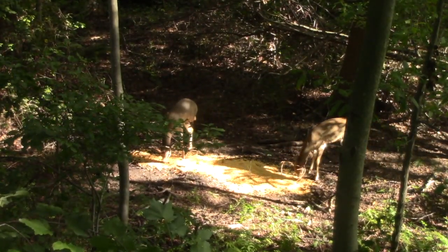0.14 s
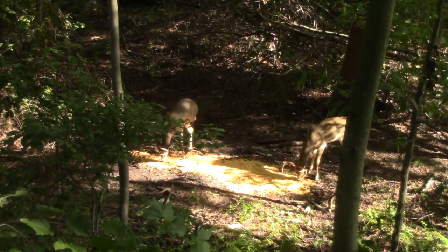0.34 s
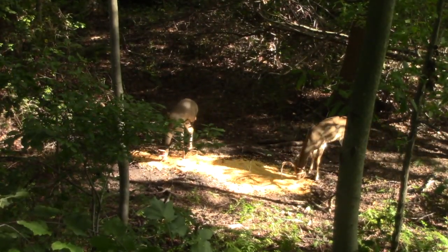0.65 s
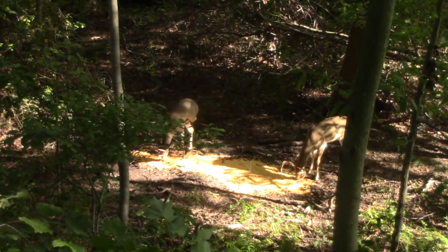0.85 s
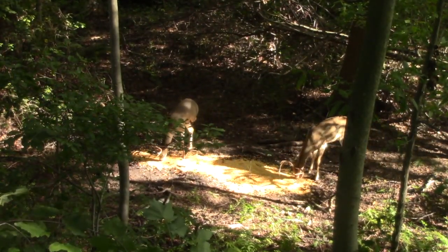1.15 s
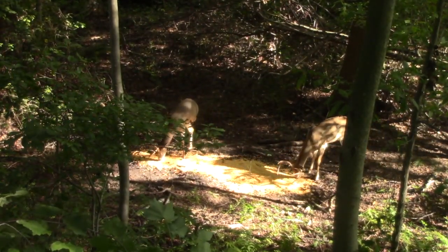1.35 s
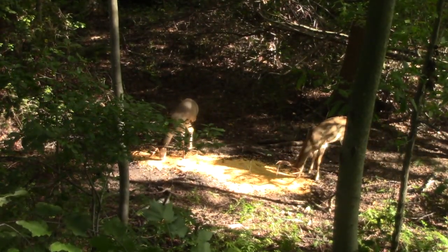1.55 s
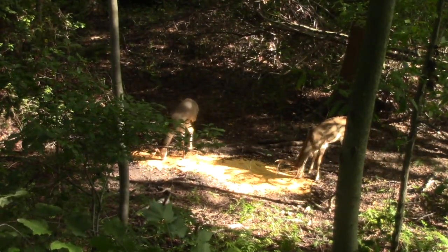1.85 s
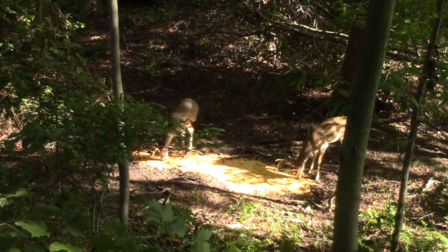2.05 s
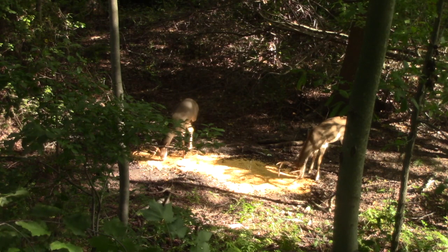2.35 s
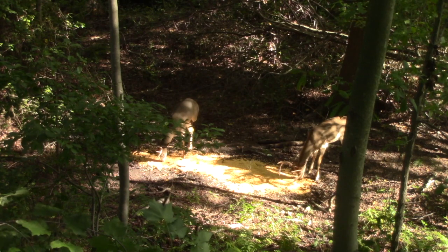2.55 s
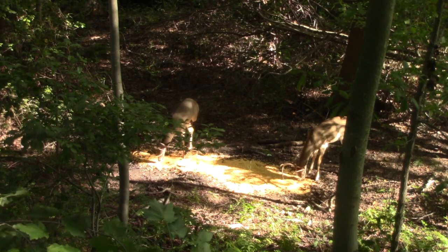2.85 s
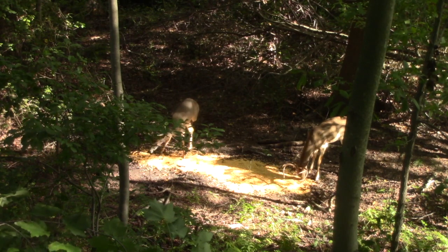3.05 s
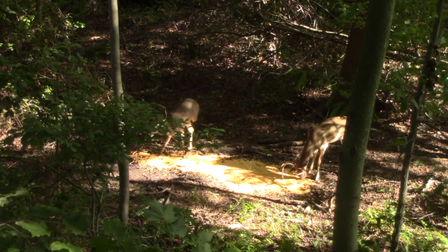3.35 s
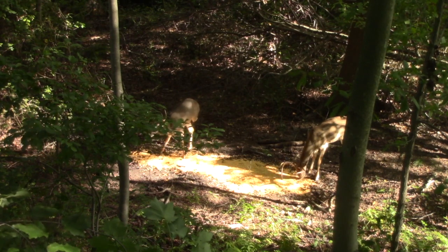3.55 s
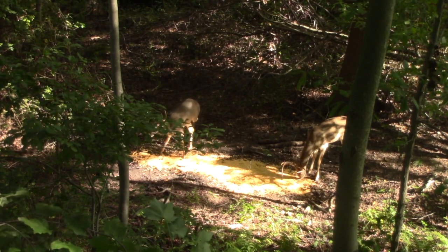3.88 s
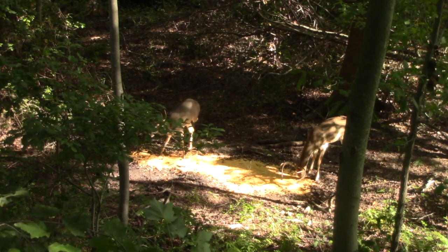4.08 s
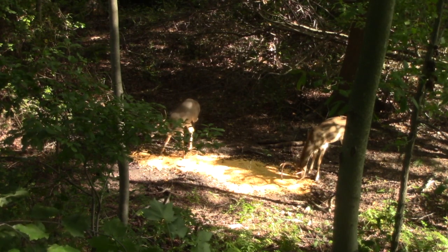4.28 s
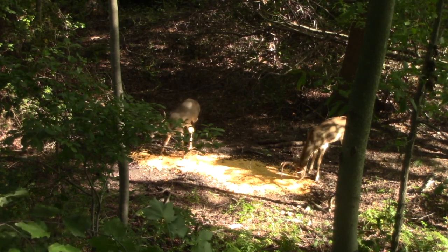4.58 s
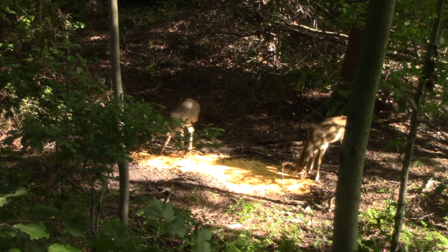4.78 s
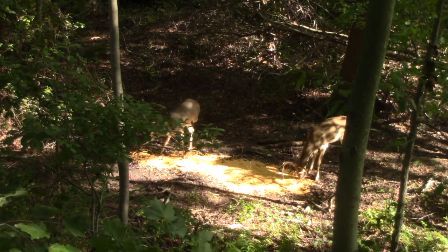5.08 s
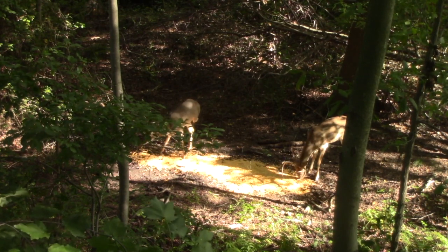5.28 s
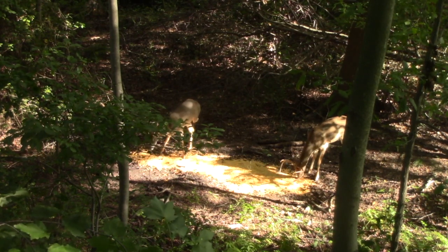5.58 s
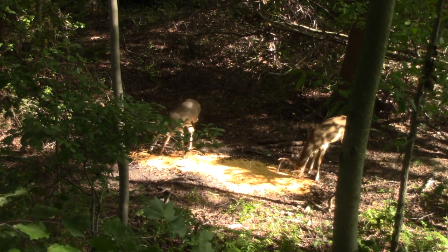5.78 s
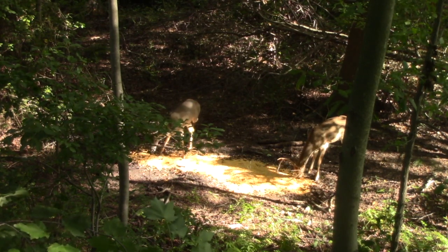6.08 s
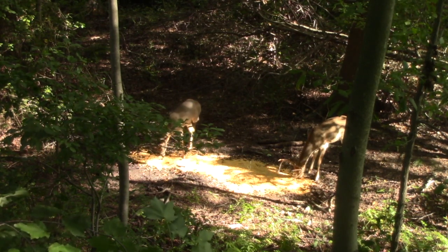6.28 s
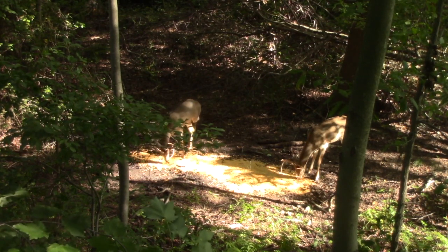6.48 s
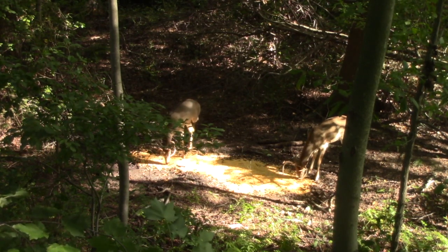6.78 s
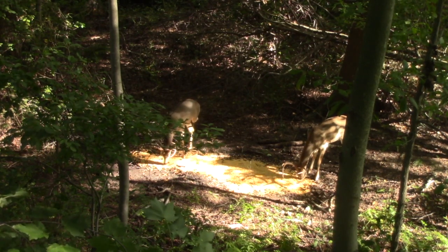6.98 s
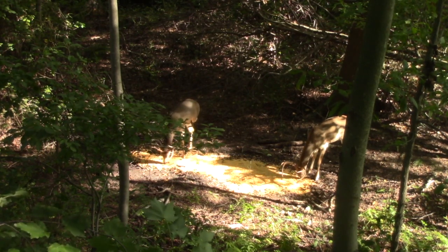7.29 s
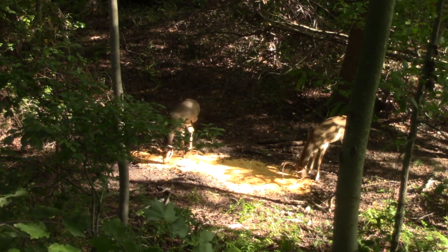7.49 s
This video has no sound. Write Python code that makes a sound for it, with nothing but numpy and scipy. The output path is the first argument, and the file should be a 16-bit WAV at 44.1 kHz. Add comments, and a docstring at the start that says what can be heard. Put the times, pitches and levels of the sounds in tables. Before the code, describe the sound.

Inside a wood near a main road, a vehicle's dull, fluttering tyre roar sinks behind the trees, leaving a murmur of distant cars. After about six seconds another vehicle bursts out of cover, louder and brighter, slightly left of centre less than right. Very faint high bird peeps, dry leaf ticks and rustling from grazing deer lie close by, with thin hiss over everything.

```python
"""Main road heard from inside a wood

One vehicle fades behind the trees, a far stream of cars murmurs on, then another vehicle swells past.
The traffic is coloured noise whose level is shaped across time and frequency, with a random, patchy flutter.
Close by, wavering tones make a small bird's peeps; noise bursts in resonances make ticks and a twig crack;
resonant clicks make the litter rustle under grazing deer. A thin hiss and a pulsing whine lie on top."""
import sys
import numpy as np
from scipy import signal
from scipy.fft import rfft, irfft, next_fast_len
from scipy.io import wavfile
from scipy.ndimage import map_coordinates

SR = 44100
rng = np.random.default_rng(int(sys.argv[2]) if len(sys.argv) > 2 else 0)


def dump(signal):
    """Clip the signal to [-1, 1] and save it as 16-bit WAV at the path in sys.argv[1]."""
    limited = np.clip(np.atleast_2d(signal).T, -1, 1)
    pcm = np.round(limited * 32767).astype(np.int16)
    wavfile.write(sys.argv[1], SR, pcm)


N = 336527
T = np.arange(N) / SR  # time axis, s

# dry needles and leaves ticking: t/s, peak level/dB, pitch f/Hz
TICKS = [(0.146, -61, 9550), (0.157, -67, 11600), (0.215, -73, 12000), (0.4417, -51, 8550),
         (0.83, -67, 9800), (0.842, -77, 11800), (0.945, -71, 10100), (0.998, -61.5, 10160),
         (1.095, -78, 10600), (1.1153, -55, 10740), (1.2539, -69, 10650), (1.28, -74, 10900),
         (1.3916, -72, 10100), (1.503, -75, 10400), (1.549, -78, 10000), (1.908, -75, 9750),
         (2.0925, -74, 10900), (2.3935, -76, 11500), (2.5425, -68, 9780), (2.672, -63.5, 8550),
         (2.7471, -73, 8400), (2.9197, -69, 9550), (3.053, -72, 12200), (3.7468, -71, 10400),
         (3.908, -64, 10300), (4.013, -75, 10200), (4.2117, -72, 9950), (4.3316, -77, 9520),
         (4.3685, -75, 8420), (4.519, -74, 9780), (4.571, -77, 9650), (4.6856, -69, 9700),
         (4.748, -69, 8330), (4.945, -77, 9800), (5.639, -79, 10500), (5.7089, -79, 9430),
         (6.435, -60, 11600), (6.6257, -61, 11200), (7.2618, -60, 11400)]


def undb(db):
    """Decibels to gain."""
    return 10 ** (np.asarray(db) / 20)


def unit(x):
    """Scale to rms 1."""
    return x / np.sqrt(np.mean(x ** 2))


def bell(x, half):
    """A smooth rise and fall around zero, down to 1/e at the half length."""
    return np.exp(-(x / half) ** 2)


def pan(x, db):
    """Place a sound by its left minus right level; negative is to the right."""
    return np.array([x * undb(db / 2), x * undb(-db / 2)])


def noise(colour, band=(20, 20000)):
    """Noise with a (Hz, dB) spectrum, scaled so that the part inside the band has rms 1."""
    size = next_fast_len(N)
    f = np.fft.rfftfreq(size, 1 / SR)
    hz, db = np.transpose(colour)
    gain = undb(np.interp(np.log(f + 1), np.log(hz), db))
    inside = (f > band[0]) & (f < band[1])
    gain /= np.sqrt(np.mean(gain ** 2 * inside))
    return irfft(rfft(rng.standard_normal(size)) * gain)[:N]


def walk(t, rate):
    """Smooth random curve with rms 1 that changes about rate times a second."""
    knots = rng.standard_normal(4096)
    return unit(map_coordinates(knots, [t * rate + 8 * rng.random()], order=2, mode="wrap"))


def ring(x, hz, width_hz):
    """A broad resonance, applied twice for steep sides."""
    b, a = signal.iirpeak(hz, hz / width_hz, fs=SR)
    return signal.lfilter(b, a, signal.lfilter(b, a, x))


def uneven(x, flutter_db, patchy_db, shade_db=None):
    """Make the level flutter at random, as a whole and in narrow patches of time and pitch."""
    frame, hop = 512, 128  # samples
    throb_db = 1.9
    f, t, cells = signal.stft(x, SR, nperseg=frame, noverlap=frame - hop)

    # the rumble throbs on its own, apart from the flutter above it
    low = np.interp(f, [350, 600], [1, 0])
    throb = throb_db * np.outer(low, walk(t, 28))
    flutter = flutter_db * np.outer(1 - low, walk(t, 45))

    # one random knot every 210 Hz and 48 times a second
    place = np.meshgrid(f / 210, t * 48, indexing="ij")
    patches = map_coordinates(rng.standard_normal((128, 512)), place, order=2, mode="wrap")
    db = throb + flutter + patchy_db * unit(patches)
    if shade_db is not None:
        db = db + shade_db(f, t)
    return signal.istft(cells * undb(db), SR, nperseg=frame, noverlap=frame - hop)[1][:N]


def passing_db(t):
    """Each part swells and falls on its own time; trees screen it until the vehicle reaches the open."""
    # rows: engine rumble, lower roar, upper roar, tread hiss; columns: peak of the unscreened curve t/s,
    # its level/dB, time to fall by 6 dB t/s, loss behind the trees' edge/dB, further loss deeper in/(dB/s)
    passing_parts = [(5.97, -56, 1.6, 5, 22), (7.06, -44.5, 2.8, 10.5, 18.5), (6.23, -45, 1.0, 6.5, 28),
                     (6.68, -55, 0.6861, 7, 0)]
    clears_trees_s, edge_s = 6.027, 0.029  # when it comes into the open, and how abruptly
    screened = .5 - .5 * np.tanh((t - clears_trees_s) / (2 * edge_s))
    depth_s = np.maximum(clears_trees_s - t, 0)
    levels = []
    for s, db, fall, edge, deeper in passing_parts:
        open_db = db - 20 * np.log10(2) * ((t - s) / fall) ** 2
        levels.append(open_db - edge * screened - deeper * depth_s)
    return levels


def leaving_db(t):
    """Each part drifts slowly in level with distance, then fades faster behind the trees."""
    # rows: engine rumble, lower roar, upper roar, tread hiss; columns: level at the start/dB,
    # fade with distance/(dB/s) (negative rises), goes behind the trees t/s, further fade there/(dB/s)
    leaving_parts = [(-63.5, 2.5, 3.7, 12), (-50.5, -0.5, 1.86, 8), (-55.5, 3, 3.05, 13.5),
                     (-68.5, 1, 1.44, 7)]
    return [db - fade * t - further * np.maximum(t - hidden, 0)
            for db, fade, hidden, further in leaving_parts]


def swell_db(f, t):
    """Parts of the road noise briefly swell or dim."""
    # columns: t/s, half length t/s, centre f/Hz, gain/dB, reach above and below/octaves
    swells = [(0.03, 0.058, 1400, 3, .9), (0.18, 0.028, 250, 7, 0.8), (0.42, .04, 210, -5, .7),
              (1.07, .025, 900, -5, .45), (1.1, .035, 2750, 5, .25), (1.573, 0.038, 1100, 5, .5),
              (1.89, 0.055, 700, 7, 0.3), (1.96, .014, 900, -5, 1), (2.0, .02, 200, -9, .9),
              (2.02, .03, 820, 4.5, .55), (2.125, 0.06, 1000, -3.5, 2.8), (2.4, 0.024, 337, 11, 0.24),
              (2.43, .05, 1100, 2.5, .7), (2.485, .022, 200, 7, .7), (2.6, .7, 520, -3, .25),
              (2.7, 0.024, 800, -4.5, 1.2), (2.83, 0.05, 1080, 8, 0.45), (2.925, .035, 780, 8.5, .3),
              (3.0, 0.08, 1200, 4.5, 0.5), (3.055, .02, 180, 7, .9), (3.12, 0.03, 834, -6, 0.68),
              (3.203, 0.05, 1000, 6, 0.6), (3.22, .03, 350, 8, .5), (3.615, 0.04, 830, 8, 0.38),
              (3.91, .025, 220, 6, .9), (4.1, .25, 1600, 2, .4), (4.22, 0.05, 720, 6, .35),
              (4.297, 0.021, 910, -8, 0.69), (4.47, .028, 150, 5, .9), (4.54, .07, 700, -5, .35),
              (5.6, .04, 680, -6, .4), (5.77, .06, 290, 4, .35), (5.998, 0.032, 2570, 7, 0.71),
              (6.075, 0.04, 1410, 5, 0.75), (6.157, 0.018, 1200, -4, .9), (6.197, 0.038, 1360, 4, 0.46),
              (6.256, 0.053, 3000, -3.5, 1.1), (6.29, .035, 320, 4.5, .35), (6.385, 0.04, 2300, 7, 0.38),
              (6.5, .022, 280, 6, .45), (6.53, .02, 680, 5, .3), (6.56, 0.14, 3800, 5.5, 0.5),
              (6.575, 0.035, 2330, -7, 0.33), (6.593, 0.019, 1380, 4.5, 0.42), (6.87, .025, 200, 5, .5),
              (6.889, 0.035, 2450, 6, 1), (7.1, .07, 4300, 3.5, .8), (7.145, 0.05, 1250, 3.5, 0.45),
              (7.39, .05, 3600, 3, .6), (7.484, 0.019, 560, 5, 0.33), (7.55, 0.1, 1900, -3.5, .7),
              (7.61, .045, 700, -4.5, 1.8)]
    total = 0
    for s, half, hz, db, octaves in swells:
        across_pitch = bell(np.log2((f + 1) / hz), octaves)
        total = total + db * np.outer(across_pitch, bell(t - s, half))
    return total


def vehicle(parts_db, colour, flutter_db, patchy_db):
    """Engine rumble, lower and upper tyre roar and tread hiss follow the levels its motion gives them."""
    source = noise(colour)
    f, power = signal.welch(source, SR, nperseg=4096)
    bands = [(120, 450), (550, 1150), (1200, 2000), (2200, 4200)]  # Hz, one per part
    own_db = [10 * np.log10(power[(f > lo) & (f < hi)].sum() * f[1]) for lo, hi in bands]

    def shade_db(f, t):
        """Blend the part levels smoothly across frequency."""
        place = np.interp(f, [340, 600, 950, 1400, 1700, 2500], [0, 1, 1, 2, 2, 3])
        total = swell_db(f, t)
        for k, (db, own) in enumerate(zip(parts_db(t), own_db)):
            share = np.maximum(1 - np.abs(place - k), 0)
            total = total + np.outer(share, db - own)
        return total

    return uneven(source, flutter_db, patchy_db, shade_db)


def leaving_vehicle():
    """A vehicle drives off and its tyre roar sinks behind the trees."""
    # spectrum before the part levels are set: f/Hz, relative level/dB
    leaving_colour = [(30, -57), (65, -39.5), (120, -30), (190, -18), (470, -12.5), (660, -2.5), (930, 2),
                      (1200, 0), (1700, -6.5), (2300, -16.5), (3200, -24), (4500, -35), (8000, -46),
                      (12000, -58)]
    return pan(vehicle(leaving_db, leaving_colour, flutter_db=1.0, patchy_db=2.0), -1.8)


def passing_vehicle():
    """A vehicle swells past on the right, its tread hiss placed further aside than its roar."""
    # spectrum before the part levels are set: f/Hz, relative level/dB
    passing_colour = [(30, -34), (68, -38.5), (134, -14.5), (270, -7), (440, -7.5), (660, -3), (1120, -4),
                      (1680, -5.5), (1930, -9.5), (2180, -9.5), (2480, -13), (3200, -16.5), (3750, -20),
                      (4400, -27.5), (4740, -31), (6300, -38.5), (8000, -44.5), (9600, -52), (12000, -65.5),
                      (16500, -87)]
    passing = vehicle(passing_db, passing_colour, flutter_db=0.7, patchy_db=2.9)
    side_db = np.interp(T, [5.6, 6.3, 7.6], [-3.2, -4.2, -2.6])
    # the microphones are more directional for the tread hiss
    tread = ring(passing, 2800, 2400)
    return pan(passing - tread, side_db) + pan(tread, side_db - 1.0)


def far_stream():
    """Many far cars merge into a patchy murmur that rises, then eases slightly."""
    # spectrum: f/Hz, relative level/dB
    stream_colour = [(30, -50), (65, -48), (120, -29), (180, -17), (300, -16.5), (470, -17), (600, -10),
                     (730, -2.5), (1200, 0), (1600, -2), (2200, -19), (3000, -26), (4000, -38), (8000, -52)]
    # course: t/s, level/dB
    stream_level = [(3.0, -62), (3.8, -58), (5.6, -59)]
    source = noise(stream_colour, band=(700, 1900))
    stream = uneven(source, flutter_db=0.05, patchy_db=3.5, shade_db=swell_db)
    times, level_db = np.transpose(stream_level)
    return pan(stream * undb(np.interp(T, times, level_db)), -2.1)


def knocks(table, t60, width, tail_db, tail_t60, snap=0):
    """Each blow is a short noise burst in a broad resonance, with a weak tail and an optional snap."""
    # t60 values in s; width as a fraction of the pitch
    out, t = np.zeros(N + SR), T[:SR // 4]
    body = np.exp(-np.log(1000) * t / t60)
    tail = undb(tail_db) * np.exp(-np.log(1000) * t / tail_t60)
    for s, db, hz in table:
        push = rng.standard_normal(len(t)) * (body + tail) + snap * (t == 0)
        burst = ring(push, hz, width * hz)
        start = int(s * SR)
        out[start:start + len(t)] += undb(db) * burst / np.abs(burst).max()
    return out[:N]


def road_thuds():
    """Brief thuds in the road noise, with the edge taken off by distance."""
    # columns: t/s, peak level before the low-pass/dB, pitch f/Hz
    blows = [(0.648, -49, 264), (0.677, -37, 940), (0.729, -44, 895), (0.862, -40, 1070), (1.002, -41, 900),
             (1.189, -35, 870), (1.882, -37, 680), (1.912, -36.5, 760), (1.977, -37, 744),
             (2.010, -43, 915), (2.032, -33, 900), (2.073, -36, 920), (2.084, -38.5, 890),
             (2.277, -43, 840), (2.655, -42, 1050), (4.337, -45, 1270), (5.725, -46, 280),
             (5.837, -37, 1400), (6.295, -38, 303), (6.539, -28.5, 690), (6.7, -35, 950)]
    sharp = knocks(blows, t60=0.016, width=0.52, tail_db=-22, tail_t60=0.12, snap=16)
    dull = signal.sosfilt(signal.butter(4, 1650, fs=SR, output="sos"), sharp)
    return pan(dull, -1.3)


def bird():
    """Thin, ragged peeps, each at its own pitch: a wavering tone with a little rasp around it."""
    # columns: t/s, level before the overall trim/dB, half length t/s
    peeps = [(0.25, -74, .035), (0.66, -78.5, .035), (1.04, -75, .035), (1.455, -75, 0.037),
             (1.81, -80, 0.034), (2.175, -77, .05), (2.58, -77, 0.044), (2.97, -82.5, 0.04),
             (3.297, -76, .024), (3.638, -73.5, 0.038), (4.08, -72, .036), (4.44, -78, .035),
             (4.79, -71, 0.037), (5.125, -69, 0.028), (5.575, -72, 0.028)]
    pitch_hz, scatter_hz, waver_hz = 8240, 35, 70
    ragged_db, rasp_db, trim_db = 5.0, -10, -5.0
    swell = sum(undb(level) * bell(T - s, half) for s, level, half in peeps)
    offsets = rng.standard_normal(len(peeps))
    centre_hz = pitch_hz + scatter_hz * np.interp(T, [s for s, _, _ in peeps], offsets)
    tone_hz = centre_hz + waver_hz * walk(T, 400)
    core = unit(np.sin(2 * np.pi * np.cumsum(tone_hz) / SR))
    rasp = undb(rasp_db) * unit(ring(rng.standard_normal(N), pitch_hz - 60, 750))
    voice = unit((core + rasp) * undb(ragged_db * walk(T, 160)))
    return undb(trim_db) * swell * voice


def litter_ticks():
    """Dry needles and leaves snap as short, high, narrow bursts."""
    return knocks(TICKS, t60=0.011, width=0.094, tail_db=-18.5, tail_t60=0.18)


def twig_crack():
    """A twig cracks as three lower, broader bursts in quick succession."""
    # columns: t/s, peak level/dB, pitch f/Hz
    cracks = [(3.256, -61, 3630), (3.263, -57.5, 3100), (3.267, -62, 4950)]
    return knocks(cracks, t60=0.036, width=0.46, tail_db=-8, tail_t60=0.14)


def litter_rustle():
    """Countless leaf cracks of random size and pitch, louder when the deer shuffle and after each tick."""
    # leaves and needles of different sizes: resonance f/Hz, relative level/dB
    leaf_rings = [(7200, 0.5), (7900, -4), (8700, -4), (9500, -1.5), (10200, -1.5), (10900, -6),
                  (11700, -6.5), (12600, -12)]
    # hooves and muzzles shuffle the litter: t/s, half length t/s, level/dB
    shuffle_times = [(0.18, 0.19, -83.5), (0.837, 0.027, -87), (1.27, 0.044, -82), (1.92, 0.027, -87),
                     (2.566, 0.022, -84), (2.907, .05, -88), (3.058, 0.03, -85.5), (4.367, 0.034, -85),
                     (3.75, .1, -97), (4.65, 0.16, -97), (5.73, .025, -86), (6.474, 0.15, -75.5),
                     (7.153, .03, -83)]
    cracks_per_s, grain_db = 2800, 2.1  # cracks over all pitches; dB per step of random size
    rustle_db, rustle_swing_db, rustle_rate = -99.5, 2.5, 25  # rustle in between; changes per second
    settle_db, settle_s = -22.5, 0.026  # leaves settle: level against the tick, decay time

    cracks = 0
    for hz, db in leaf_rings:
        strikes = rng.random(N) < cracks_per_s / len(leaf_rings) / SR
        size = np.minimum(rng.exponential(size=N), 5)
        pushes = strikes * rng.standard_normal(N) * undb(grain_db * size)
        cracks = cracks + undb(db) * ring(pushes, hz, 650)
    rustle = unit(uneven(cracks, flutter_db=1.6, patchy_db=3.4))

    restless = undb(rustle_db + rustle_swing_db * walk(T, rustle_rate))
    shuffles = sum(undb(db) * bell(T - s, half) for s, half, db in shuffle_times)
    settling = sum(undb(db + settle_db) * (T > s) * np.exp(-np.abs(T - s) / settle_s)
                   for s, db, _ in TICKS)
    return rustle * np.sqrt(restless ** 2 + shuffles ** 2 + settling ** 2)


def trunks(x, db, t60):
    """Trunks scatter a faint, diffuse echo: a decaying noise tail, different on each side."""
    t = T[:SR // 2]
    tails = rng.standard_normal((2, len(t))) * undb(-60 * t / t60)
    tails /= np.sqrt(np.sum(tails ** 2, axis=1, keepdims=True))
    return undb(db) * signal.fftconvolve(x, tails, axes=1)[:, :N]


def hiss_and_whine():
    """A grainy, wavering band of hiss near 5 kHz and a faint pulsing whine."""
    # spectrum of the hiss: f/Hz, relative level/dB
    hiss_colour = [(2500, -33.5), (3900, -8), (4500, 1.5), (5200, 7), (5750, 2.5), (6150, -14.5),
                   (8000, -16.5), (11000, -22.5), (12700, -45), (14000, -51)]
    hiss_db, whine_db = -78.5, -91.0
    whine_hz, pulse_hz, first_s = 6478, 12.59, .052
    hiss = uneven(noise(hiss_colour), flutter_db=1.2, patchy_db=3.4)
    tone = np.sin(2 * np.pi * whine_hz * T + 1.0 * walk(T, 90))  # phase wanders by about 1 rad
    pulses = np.cos(np.pi * pulse_hz * (T - first_s)) ** 6
    return pan(undb(hiss_db) * hiss + undb(whine_db) * tone * pulses, -1.7)


def scene():
    """The road behind the trees, the small sounds close by, their echoes, and the hiss and whine."""
    traffic = leaving_vehicle() + passing_vehicle() + far_stream() + road_thuds()
    near = litter_ticks() + twig_crack() + bird() + litter_rustle()
    traffic_echo = trunks(traffic, db=-21.5, t60=0.13)
    near_echo = trunks(near[None], db=-17.5, t60=0.21)
    return traffic + traffic_echo + pan(near, -.1) + near_echo + hiss_and_whine()


def record(dry):
    """A steep low-pass cuts the top above 13.5 kHz."""
    return signal.sosfilt(signal.ellip(8, .2, 70, 13500, fs=SR, output="sos"), dry)


dry = scene()
out = record(dry)
dump(out)
```